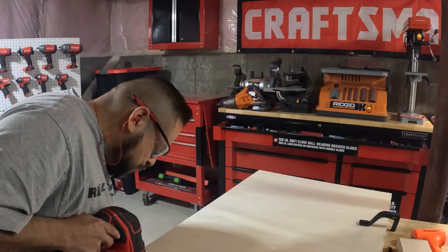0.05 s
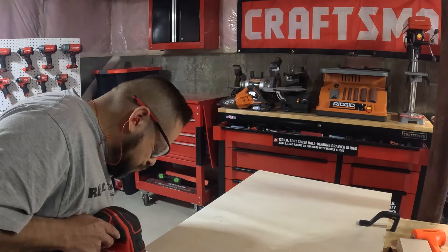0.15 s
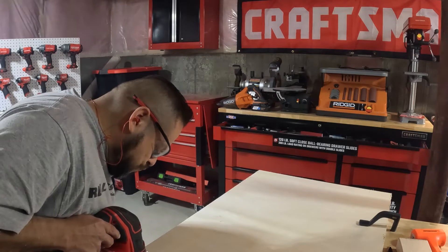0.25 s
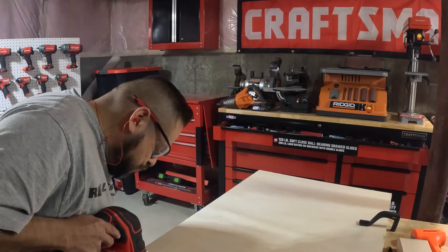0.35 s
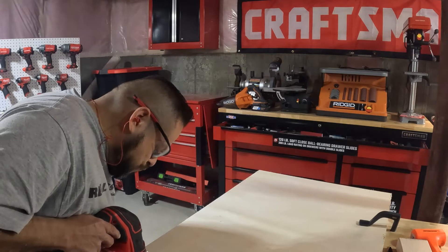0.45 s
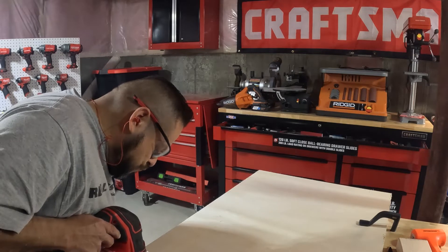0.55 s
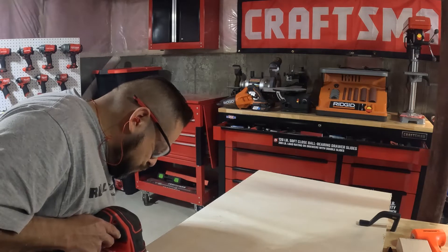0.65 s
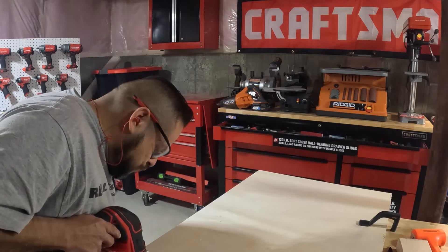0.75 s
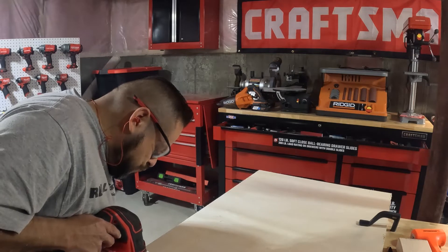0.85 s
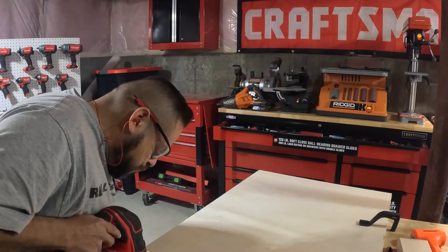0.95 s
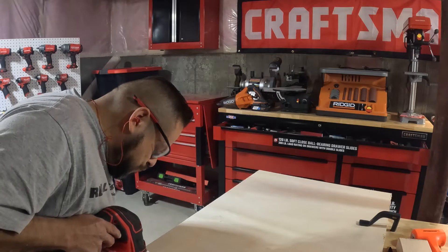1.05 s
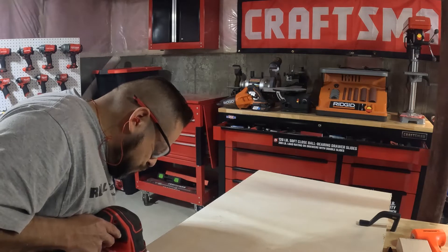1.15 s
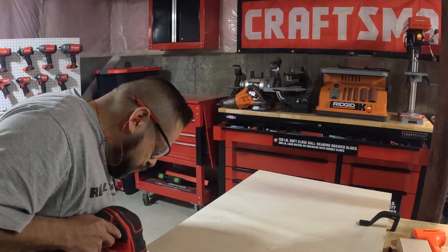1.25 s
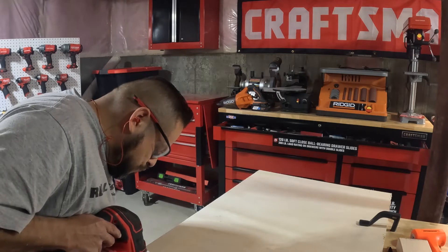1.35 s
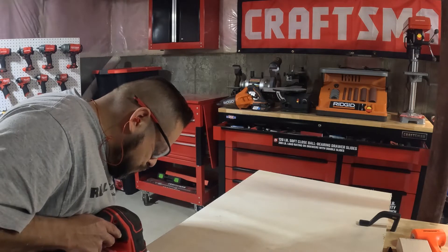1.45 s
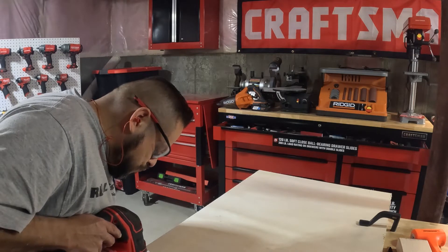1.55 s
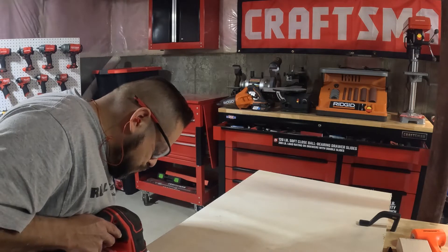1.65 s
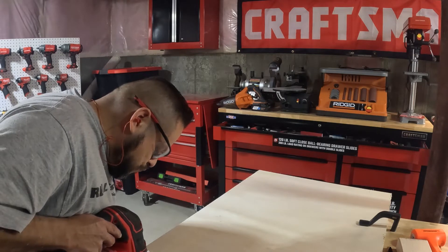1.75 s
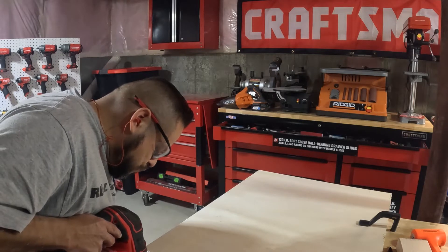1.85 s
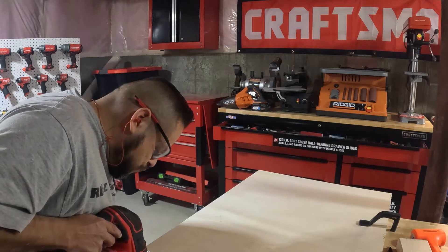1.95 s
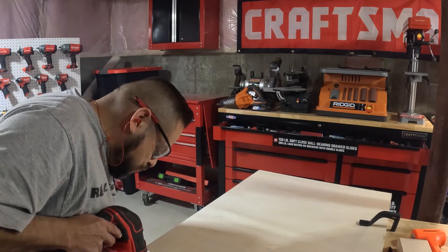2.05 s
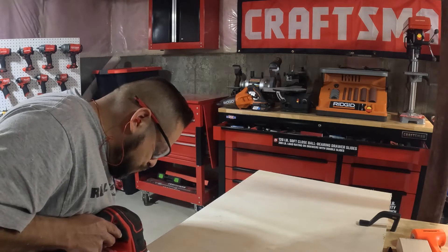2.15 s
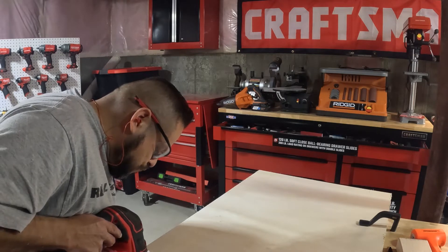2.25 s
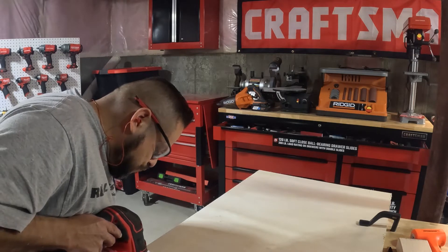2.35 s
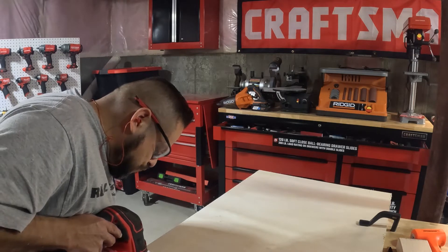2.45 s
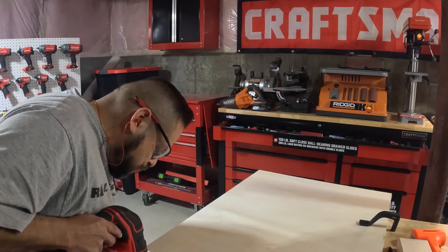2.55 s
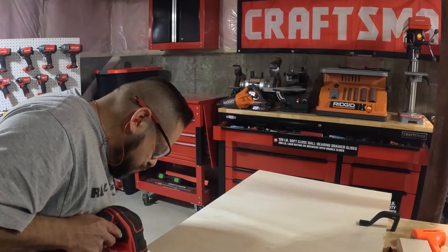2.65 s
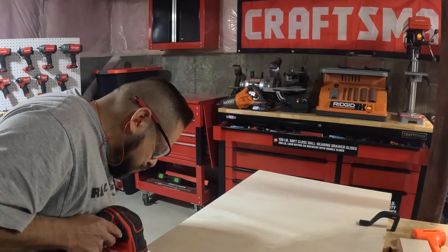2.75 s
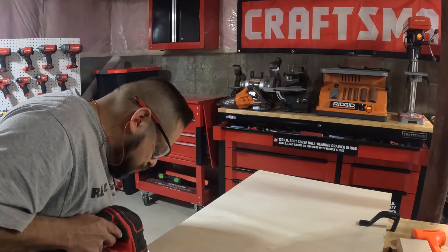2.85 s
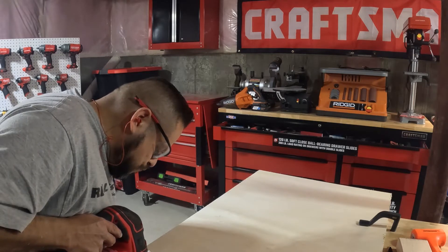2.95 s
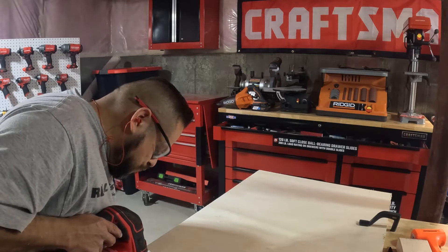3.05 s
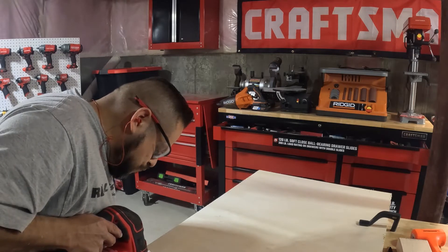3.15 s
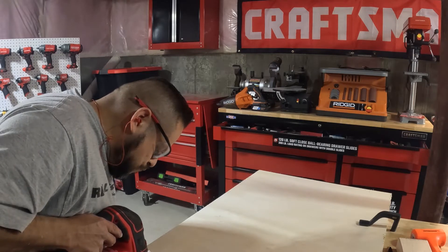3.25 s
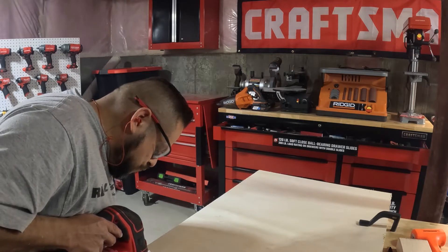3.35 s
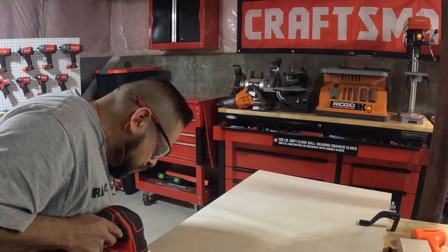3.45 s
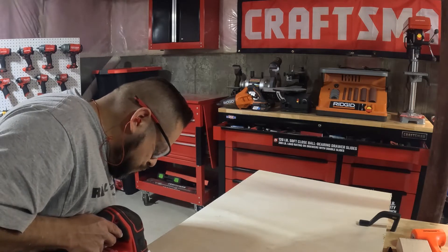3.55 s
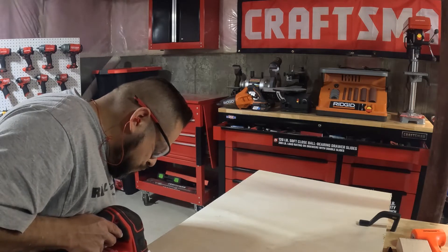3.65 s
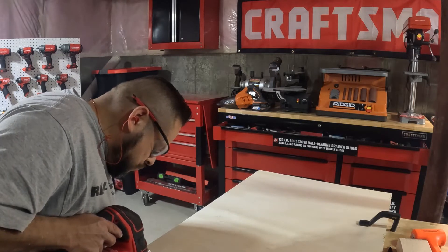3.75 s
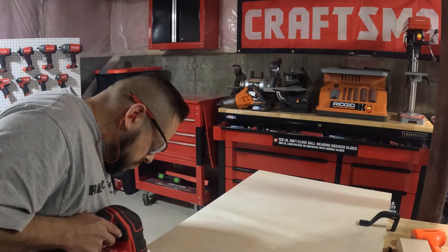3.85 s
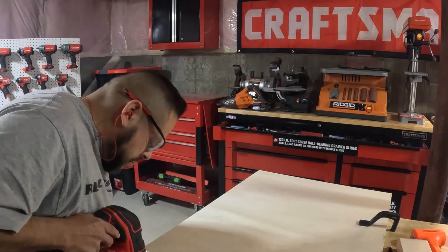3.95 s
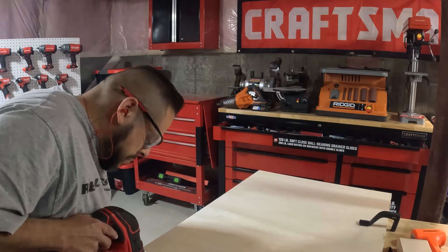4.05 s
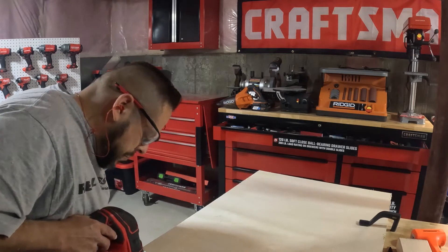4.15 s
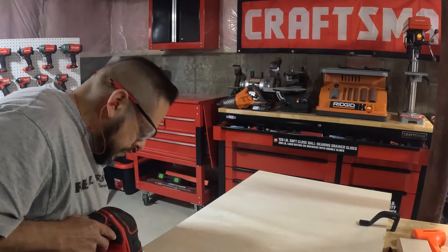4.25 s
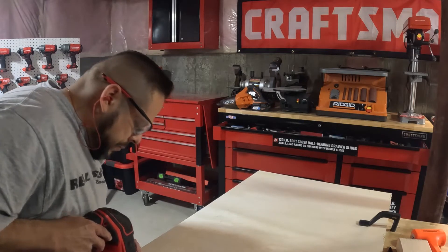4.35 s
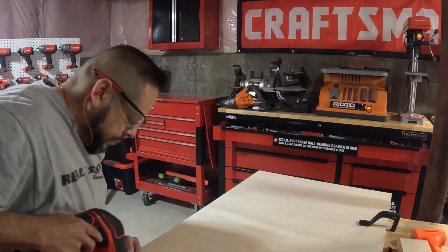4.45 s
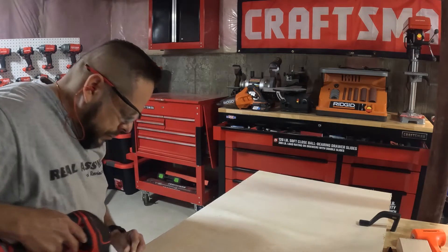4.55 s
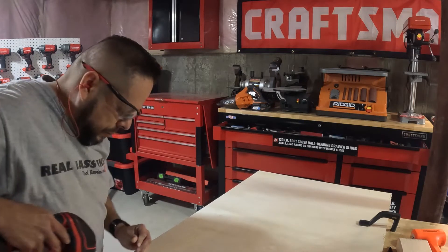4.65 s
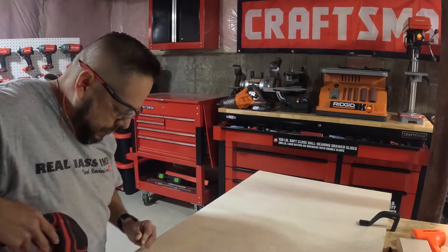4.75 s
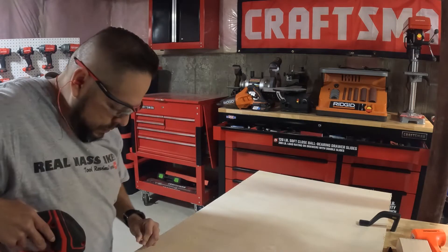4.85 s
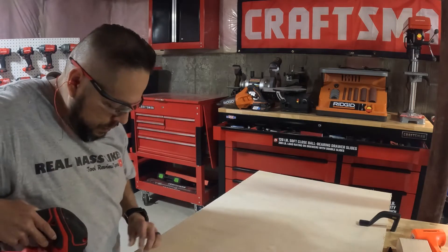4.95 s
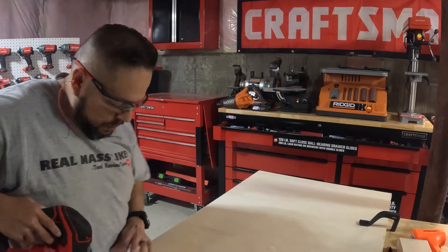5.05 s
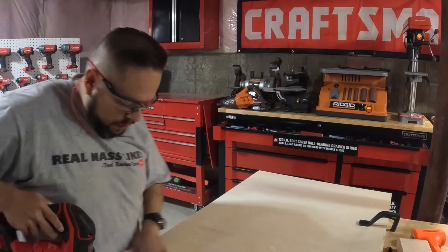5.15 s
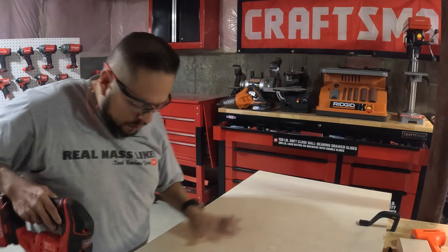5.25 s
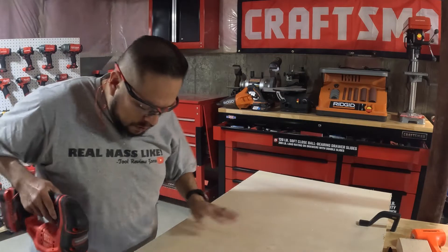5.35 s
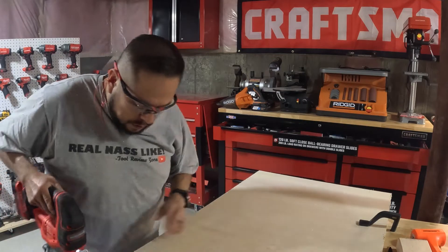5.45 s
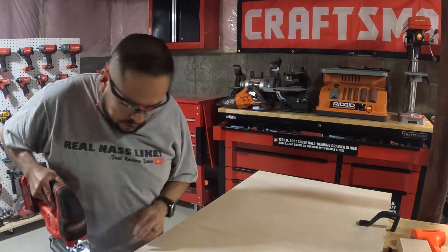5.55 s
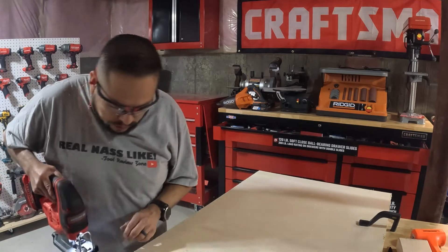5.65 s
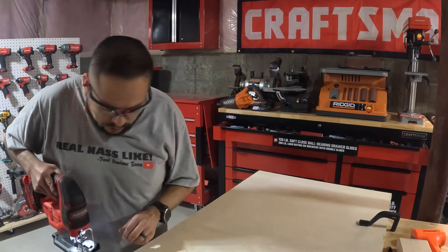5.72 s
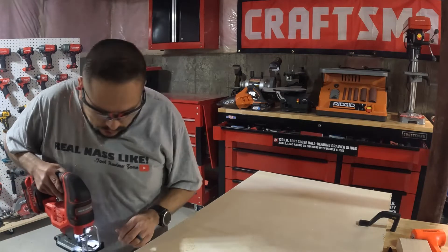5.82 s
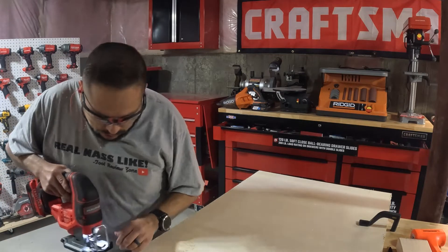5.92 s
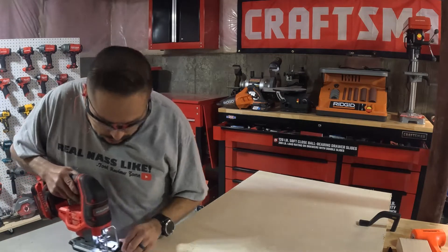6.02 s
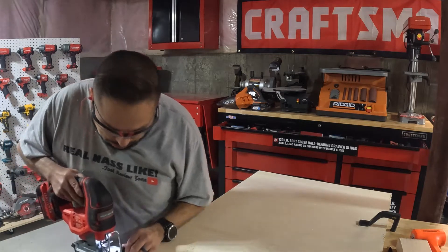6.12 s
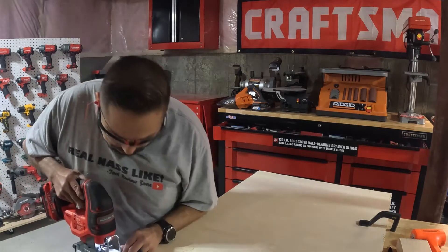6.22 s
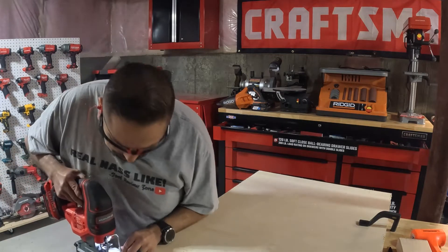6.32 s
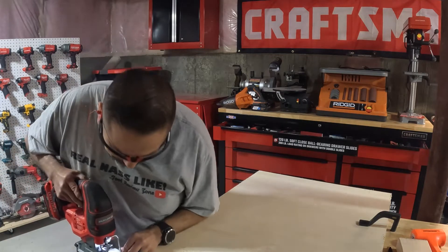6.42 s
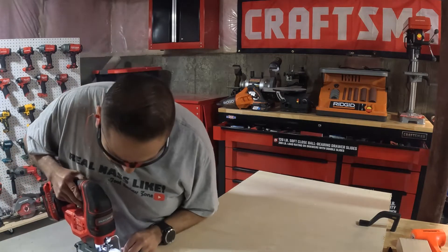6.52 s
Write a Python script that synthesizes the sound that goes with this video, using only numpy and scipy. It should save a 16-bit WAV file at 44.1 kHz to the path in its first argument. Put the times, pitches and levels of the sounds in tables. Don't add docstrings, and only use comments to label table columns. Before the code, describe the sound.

A jigsaw cuts wood at an unchanging fast speed, a harsh rattling buzz with tearing teeth, for nearly four seconds. It brakes quickly, its last jolts ringing the board. Quiet room air swells back while the blade is pulled free with knocks and ticks. A hand sweeps gritty sawdust, the metal shoe lands and slides, and dull knocks follow. Close, nearly central microphone in a small, short-echo workshop.

```python
import sys
import numpy as np
from scipy import signal
from scipy.fft import rfft, irfft, next_fast_len
from scipy.io import wavfile
from scipy.ndimage import uniform_filter1d, minimum_filter1d, map_coordinates

SR = 44100
rng = np.random.default_rng(int(sys.argv[2]) if len(sys.argv) > 2 else 0)


def wav_record(signal):
    frames = np.transpose(np.atleast_2d(signal))
    bounded = np.clip(frames, -1, 1)
    quanta = np.round(bounded * 32767).astype(np.int16)
    wavfile.write(sys.argv[1], SR, quanta)


def how_loud(loudness_db):
    steps = np.asarray(loudness_db, float) / 20
    return 10 ** steps


N = 290178

STROKES_PER_S = 52.94
BRAKE_S, STOP_S = 3.84, 4.12


def unit(x):
    return x / np.sqrt(np.mean(x ** 2) + 1e-20)


def along(points, hz):
    f, v = np.transpose(points)
    return np.interp(np.log(hz + 1), np.log(f + 1), v)


def wobble(count):
    knots = rng.standard_normal(int(N * count / SR) + 4)
    return map_coordinates(knots, [np.arange(N) * count / SR])


def filtered(x, response):
    m = next_fast_len(N + SR // 2)
    return irfft(rfft(x, m) * response(np.fft.rfftfreq(m, 1 / SR)), m)[..., :N]


def coloured(x, spectrum):
    return unit(filtered(x, lambda hz: how_loud(along(spectrum, hz))))


def causal(gain):
    def response(hz):
        cepstrum = irfft(np.log(gain(hz) + 1e-7))
        cepstrum[1:len(hz) - 1] *= 2
        cepstrum[len(hz):] = 0
        return np.exp(rfft(cepstrum))
    return response


# freq_hz, level_db (per Hz)
ROOM_AIR = [(30, -35), (90, -23), (140, -12.5), (200, 0), (300, 0), (420, -4.5), (800, -7.5), (1500, -12),
            (2500, -15.5), (4000, -28), (6500, -32.5), (9000, -58), (14000, -65.5)]


def air():
    since_stop = np.maximum(np.arange(N) / SR - STOP_S, 0)
    pressed_db = 11.5 * np.exp(-since_stop / 0.82)
    level_db = -48 - pressed_db + 0.57 * wobble(count=12)
    return how_loud(level_db) * coloured(rng.standard_normal(N), ROOM_AIR)


def blade_motion():
    t = np.arange(N) / SR
    speed = 1 - np.clip((t - BRAKE_S) / (STOP_S - BRAKE_S), 0, 1) ** 1.7
    steady = np.cumsum(STROKES_PER_S * speed) / SR + .085
    return speed, steady + .003 * wobble(count=5) + .01 * wobble(count=1)


# place_in_stroke (0-1), level_db, dying_time (share of the stroke)
STROKE_JOLTS = [(0.228, -0.5, 0.097), (0.42, -9.5, 0.061), (0.641, 0.5, 0.034), (0.75, 1, 0.07)]


def jolting(place, base_db):
    return how_loud(base_db) + sum(how_loud(db) * np.exp(-((place - at) % 1) / life) for at, db, life in STROKE_JOLTS)


# multiple (of stroke rate), level_db (rms)
STRONG_MULTIPLES = [(1, -64), (3, -43), (4, -56), (5, -36), (7, -42), (8, -45), (10, -34), (11, -35),
                    (13, -41), (16, -37), (22, -38), (25, -36), (26, -38), (27, -33), (28, -35), (40, -33),
                    (41, -32), (43, -34), (45, -39), (47, -29), (48, -34), (51, -38), (53, -31), (54, -35),
                    (55, -38), (57, -37), (59, -34), (60, -38), (64, -38), (67, -37)]
# freq_hz, level_db (rms)
WEAK_MULTIPLES = [(100, -78), (400, -84.5), (640, -41.5), (720, -61), (1000, -53), (1800, -50), (3600, -40),
                  (4300, -50.5), (5500, -51.5), (6500, -83), (9000, -84), (12000, -93)]


def gears(stroke, speed):
    size = 8192
    multiples = np.arange(size // 2 + 1)
    level = along(WEAK_MULTIPLES, multiples * STROKES_PER_S) + 3 * rng.standard_normal(len(multiples))
    level[0] = level[230:] = -200
    for k, db in STRONG_MULTIPLES:
        level[round(k)] = db

    bunching = jolting(np.arange(size) / size, base_db=-3.0)
    rattle = rfft(rng.standard_normal(size))
    for _ in range(6):
        levelled = irfft(how_loud(level) * rattle / np.abs(rattle))
        rattle = rfft(levelled * bunching)
    rattle[:9] = np.exp(1j * np.pi * np.arange(9) ** 2 / 8)
    cycle = irfft(how_loud(level) * rattle / np.abs(rattle), size) * size / np.sqrt(2)

    tone = np.interp(stroke % 1 * size, np.arange(size), cycle, period=size)
    return tone * how_loud(0.17 - 149 * (1 - speed) + 0.15 * wobble(count=6))


# freq_hz, level_db (per Hz)
TEETH = [(25, -86.5), (60, -96.5), (110, -82), (170, -79), (300, -69.5), (480, -64.5), (750, -59.5),
         (1000, -59.5), (1750, -57), (2300, -49), (3300, -51), (4500, -59.5), (6500, -72.5), (8500, -87),
         (12500, -95.5), (14300, -110)]
# centre_hz, width_hz, lift_db
RESONANCES = [(550, 36, 11.5), (790, 15, 4.5), (1395, 630, 6), (2108, 170, 4), (2410, 110, -3),
              (2834, 37, 3.5), (3080, 120, 4), (3580, 140, 3.5), (4187, 89, 7), (4900, 290, 6),
              (9600, 270, 8), (10940, 750, 8.5)]


def housing(hz):
    lift_db = sum(db / (1 + (2 * (hz - c) / w) ** 2) for c, w, db in RESONANCES)
    return how_loud(along(TEETH, hz) + lift_db)


def tearing(stroke, speed, blows):
    t = np.arange(N) / SR
    jolts = jolting(stroke + 0.0069 * wobble(count=70), base_db=5) * how_loud(0.51 * wobble(count=150))
    cut_level = how_loud(-16.5 + .3 * wobble(count=2)) * speed ** 0.64
    last_tooth_s = 4.092
    force = unit(jolts) * cut_level * (t < last_tooth_s) + blows

    gain = causal(housing)
    scale = np.std(filtered(rng.standard_normal(N), gain))
    noise = filtered(force * rng.standard_normal(N), gain) / scale

    dull_hz = 3480
    octave = lambda hz: 1 / (1 + (dull_hz / (hz + 1)) ** 4) / (1 + (hz / (2 * dull_hz)) ** 6)
    return noise - np.clip(1.3 * (1 - speed), 0, .7) * filtered(noise, octave)


# start_s, peak_db
BRAKE_JOLTS = [(3.9084, -0.5), (3.9204, -17), (3.934, -4.5), (3.9541, -8), (3.959, -16), (3.9681, -13),
               (3.9802, 1.5), (3.9944, -10), (4.0072, 0.5), (4.0211, 3), (4.0424, -12), (4.0734, -3.5),
               (4.0827, 0)]


def brake_blows():
    t = np.arange(N) / SR
    return sum(how_loud(db - 15.5) * (t > s) * how_loud(-60 * np.abs(t - s) / 0.029) for s, db in BRAKE_JOLTS)


# centre_hz, width_hz, level_db
BOARD_MODES = [(128, 6.2, -1.5), (295, 23, 0), (400, 28, 12), (601, 24, 22.5), (864, 46, 20)]


def board_ringing(blows):
    def modes(f):
        total = 0
        for c, w, db in BOARD_MODES:
            resonance = 1j * c * w / (c * c - f * f + 1j * f * w)
            total = total + how_loud(db) * (f / c) ** 2 * resonance / (1 + (f / c) ** 2)
        return total
    return how_loud(1.0) * filtered(blows, modes)


# freq_hz, t60_s
WALL_DECAY = [(100, 0.28), (1000, 0.22), (4000, 0.16), (10000, 0.22)]


def walls(x):
    hz, t, z = signal.stft(rng.standard_normal(SR // 2), SR, nperseg=256)
    decay = how_loud(-60 * t / along(WALL_DECAY, hz)[:, None])
    tail = signal.istft(z * decay, SR, nperseg=256)[1]
    return signal.fftconvolve(np.pad(x, (200, 0)), tail / np.linalg.norm(tail))[:N]


# freq_hz, side_minus_mid_db
WIDTH = [(30, -28), (90, -30), (180, -23), (360, -29.5), (700, -30.5), (1400, -36), (2800, -40),
         (5600, -19), (9000, -15), (11000, -11), (13500, 1)]


def difference(mid):
    hz, _, z = signal.stft(mid, SR, nperseg=512)
    phases = np.exp(2j * np.pi * rng.random(z.shape))
    scrambled = z * phases * how_loud(along(WIDTH, hz) + 0.5)[:, None]
    return signal.istft(scrambled, SR, nperseg=512)[1][:N]


# start_s, peak_db, best_excited_hz, loss_db (per octave away from it)
DULL_KNOCKS = [(4.36, -50, 135, 15), (4.405, -34, 800, 25), (4.453, -21, 520, 17), (4.505, -37, 290, 9),
               (4.53, -47, 135, 20), (5.205, -22.5, 340, 5), (5.226, -23, 140, 15), (5.24, -46, 680, 25),
               (5.27, -25.5, 670, 36), (5.46, -36, 550, 25), (5.512, -21.5, 740, 22), (5.61, -28, 730, 25),
               (6.205, -25, 330, 11), (6.217, -31, 300, 22), (6.262, -20, 200, 9.5), (6.263, -6.5, 70, 28),
               (6.305, -29, 250, 17), (6.45, -31, 75, 20)]
# freq_hz, level_db, t60_s
WOOD_MODES = [(70, -11.5, 0.17), (141, 2.5, 0.072), (205, -6.5, 0.058), (300, -3.5, 0.07),
              (358, -0.5, 0.13), (550, -0.5, 0.071), (675, -10.5, 0.17), (800, -6, 0.06)]


def knocks():
    out, t = np.zeros(N + SR), np.arange(SR // 2) / SR
    for s, db, centre_hz, loss_db in DULL_KNOCKS:
        band = signal.butter(3, [0.75 * centre_hz, 1.66 * centre_hz], "bandpass", fs=SR, output="sos")
        puff = unit(signal.sosfilt(band, rng.standard_normal(len(t)))) * how_loud(-15 - 60 * t / 0.055)
        ring = 0
        for hz, level_db, t60 in WOOD_MODES:
            reached_db = level_db - loss_db * abs(np.log2(hz / centre_hz))
            ring = ring + how_loud(reached_db - 60 * t / t60) * np.sin(2 * np.pi * hz * t)
        soft_start = 1 - np.exp(-t / 0.0013)
        out[round(s * SR):][:len(t)] += how_loud(db) * (ring + puff) * soft_start
    return out[:N]


def contact(s, length, first_db, last_db, rise, fall):
    t = np.arange(N) / SR - s
    drift_db = np.interp(t, [0, length], [first_db, last_db])
    return how_loud(drift_db + rise * np.minimum(t, 0) - fall * np.maximum(t - length, 0))


# full_contact_s, length_s, first_db, last_db, brightness (0-1)
BLADE_PULLS = [
    (4.37, 0.099, -54.5, -46, .45),
    (4.46, 0.013, -44.5, -44, 0.15),
    (4.62, 0.059, -62, -62, 0.76),
]
HAND_SWEEPS = [
    (4.842, 0.043, -34, -31.5, .4),
    (4.996, .06, -48, -45, .45),
    (5.17, 0.022, -58, -42.5, 0.56),
    (5.215, 0.052, -31.5, -25.5, 0.82),
    (5.31, 0.076, -42.5, -35, 0.43),
    (5.782, 0.05, -44.5, -45, 0.69),
    (5.884, .008, -42.5, -49.5, 0.76),
    (6.21, .09, -55.5, -63, .6),
    (6.362, 0.049, -37, -32.5, 0.23),
    (6.49, 0.074, -56, -68, .8),
]
SHOE_SLIDES = [
    (5.453, .04, -25, -24.5, .5),
    (5.5, 0.027, -31, -23, 0.66),
    (5.545, 0.085, -28.5, -23.5, .95),
    (5.68, 0.025, -58, -60, 0.51),
    (6.041, 0.015, -48, -35.5, .25),
]
# freq_hz, level_db (per Hz)
SOFT_RUB = [(410, -45), (700, -16.5), (1220, -7), (2540, -2.5), (2750, 1), (3010, -14), (5090, -15),
            (7500, -32.5), (9750, -72), (16500, -120)]
GRITTY_RUB = [(410, -45.5), (700, -23), (943, -23), (1350, -22), (1630, -7.5), (3360, 1.5), (4300, -3.5),
              (7500, -28.5), (9750, -76), (16500, -120)]
BOARD_RASP = [(150, -13), (400, -3.5), (600, 4), (900, -2.5), (1400, -19), (3000, -53)]
DUST_HISS = [(5000, -31.5), (7000, 4.5), (8500, -13.5), (11000, -15), (14000, -24.5)]


def rubbing():
    ways = [(BLADE_PULLS, 145, 480, -3.5, -23),
            (HAND_SWEEPS, 444, 549.5, -17, -27),
            (SHOE_SLIDES, 9003, 455, -23, -43.5)]
    soft, gritty, rasp, dust = np.zeros((4, N))
    for rubs, rise, fall, rasp_db, dust_db in ways:
        lead_s = 0.0068 if rubs is HAND_SWEEPS else 0
        for s, length, first_db, last_db, bright in rubs:
            pressure = contact(s, length, first_db, last_db, rise, fall)
            soft += np.sqrt(1 - bright) * pressure
            gritty += np.sqrt(bright) * pressure
            rasp += how_loud(rasp_db) * pressure
            flying = contact(s - lead_s, length + lead_s, first_db, last_db, rise, fall)
            dust += how_loud(dust_db) * (2 * bright) ** 1.36 * flying

    out = np.zeros(N)
    for share, tint in [(soft, SOFT_RUB), (gritty, GRITTY_RUB), (rasp, BOARD_RASP), (dust, DUST_HISS)]:
        grains = rng.standard_normal(N) * how_loud(0.91 * wobble(count=900) + 1.9 * wobble(count=90))
        out += share * coloured(grains, tint)
    return out


# start_s, peak_db, centre_hz, t60_s
SHARP_TICKS = [(4.4488, -11, 5100, 0.04), (4.45, -19.5, 9500, 0.055), (4.4512, -14, 2500, 0.031),
               (5.1648, -40, 2400, .02), (5.451, -18.5, 2620, 0.046), (5.518, -9.5, 2320, 0.0088),
               (5.5254, -5, 2480, .008), (6.0411, -24.5, 1760, .07), (6.048, -31, 1700, 0.075),
               (6.046, -36, 10000, 0.083), (6.2043, -46, 2520, 0.018), (6.2607, -40, 1100, 0.034),
               (6.359, -26.5, 2700, 0.017)]


def ticks():
    out, t = np.zeros(N + SR), np.arange(SR // 10) / SR
    for s, db, hz, t60 in SHARP_TICKS:
        band = signal.butter(2, [.72 * hz, 1.4 * hz], "bandpass", fs=SR, output="sos")
        snap = 4 * (t == 0)
        burst = signal.sosfilt(band, how_loud(-60 * t / t60) * (rng.standard_normal(len(t)) + snap))
        out[round(s * SR):][:len(t)] += how_loud(db) * burst / np.abs(burst).max()
    return out[:N]


def squeak():
    band = signal.butter(2, [4700, 5500], "bandpass", fs=SR, output="sos")
    noise = unit(signal.sosfilt(band, rng.standard_normal(N)))
    return noise * contact(6.542, .025, -57.5, -59.5, rise=444, fall=549.5)


# freq_hz, gain_db
TREBLE_LOSS = [(5000, 0.5), (7000, -19.5), (9000, -21.5), (14000, -20.5)]


def dulled(x):
    return filtered(x, causal(lambda hz: how_loud(along(TREBLE_LOSS, hz))))


def scene():
    speed, stroke = blade_motion()
    blows = brake_blows()
    handled = board_ringing(blows) + knocks() + rubbing() + dulled(ticks() + squeak())
    bass_cut = signal.butter(6, 100, "highpass", fs=SR, output="sos")
    near = tearing(stroke, speed, blows) + signal.sosfilt(bass_cut, handled)
    mid = gears(stroke, speed) + near + how_loud(-9.5) * walls(near) + air()
    side = difference(mid)
    return np.array([mid + side, mid - side])


def roll_off(x):
    return signal.sosfilt(signal.butter(12, 14340, fs=SR, output="sos"), x)


def record(dry):
    needed = np.minimum(1, .86 / (np.abs(dry).max(axis=0) + 1e-9))
    held_down = minimum_filter1d(needed, size=161)
    limited = dry * uniform_filter1d(uniform_filter1d(held_down, size=81), size=81)
    gap = lambda hz: (1 - .97 * np.exp(-((hz - 9060) / 110) ** 4)) * (hz < 14400)
    return roll_off(filtered(limited, gap))


dry = scene()
out = record(dry)
wav_record(out)
```